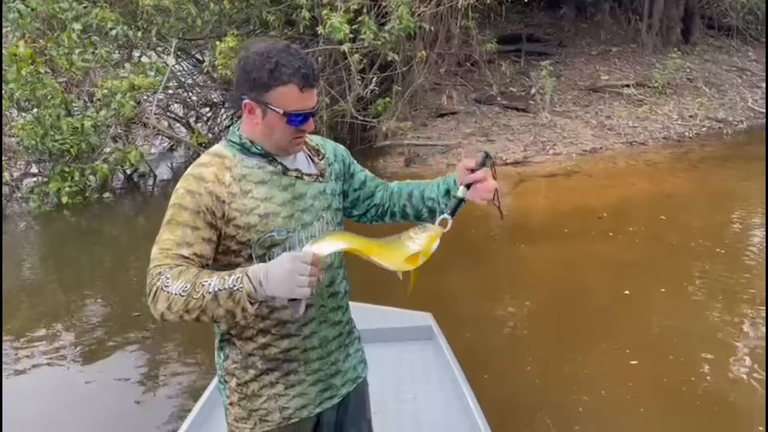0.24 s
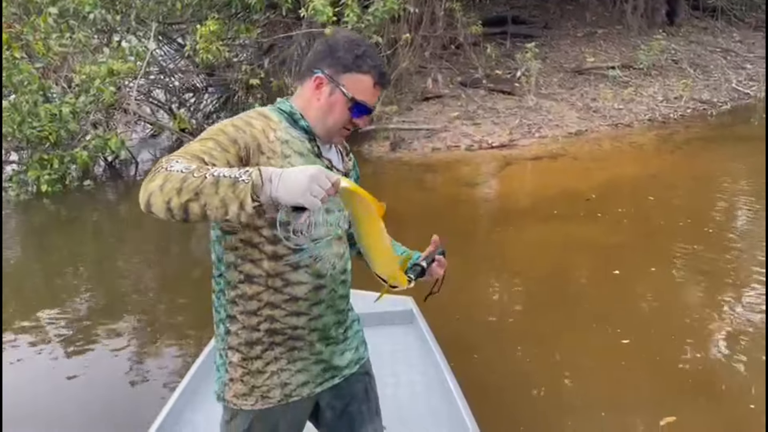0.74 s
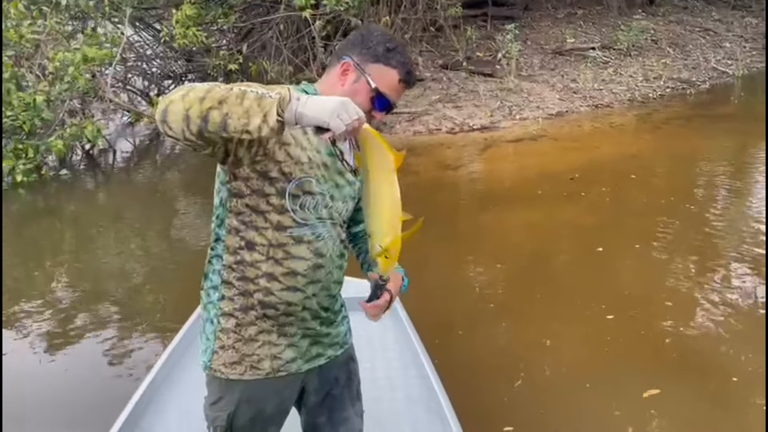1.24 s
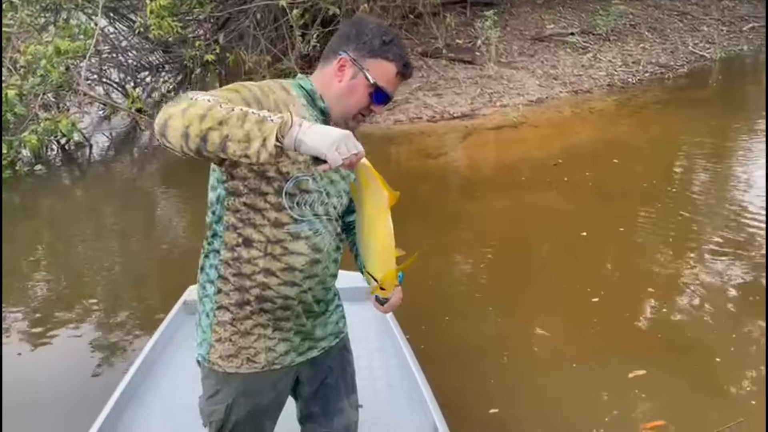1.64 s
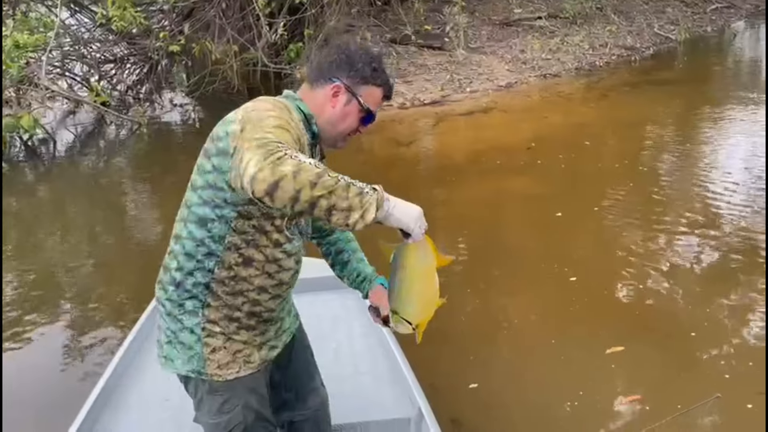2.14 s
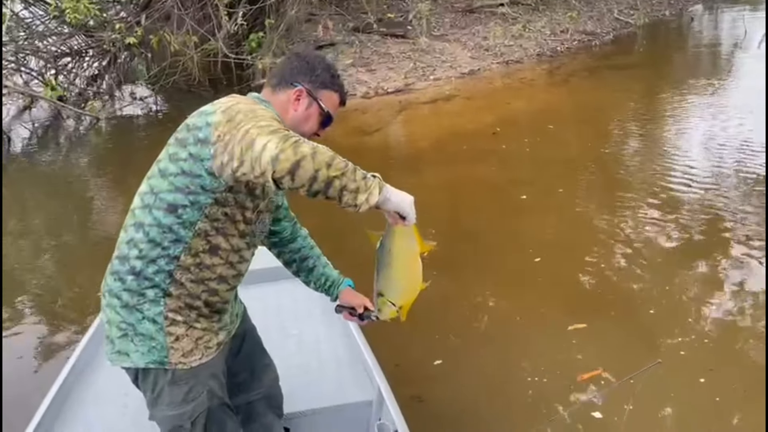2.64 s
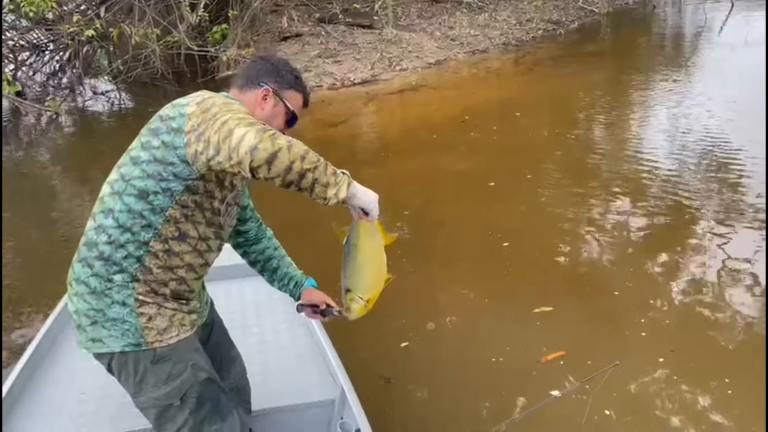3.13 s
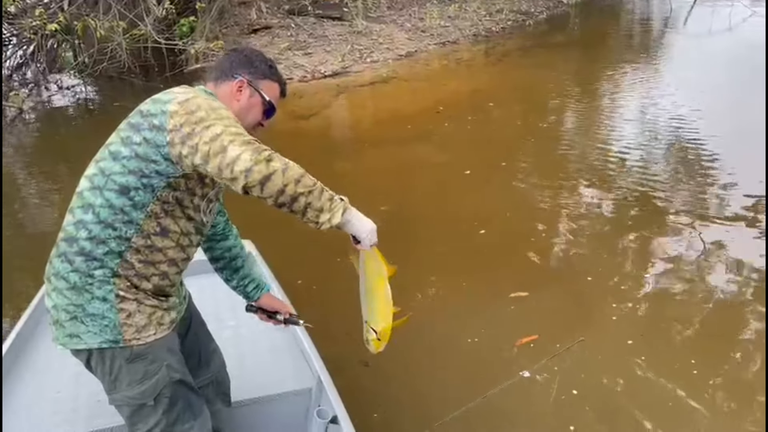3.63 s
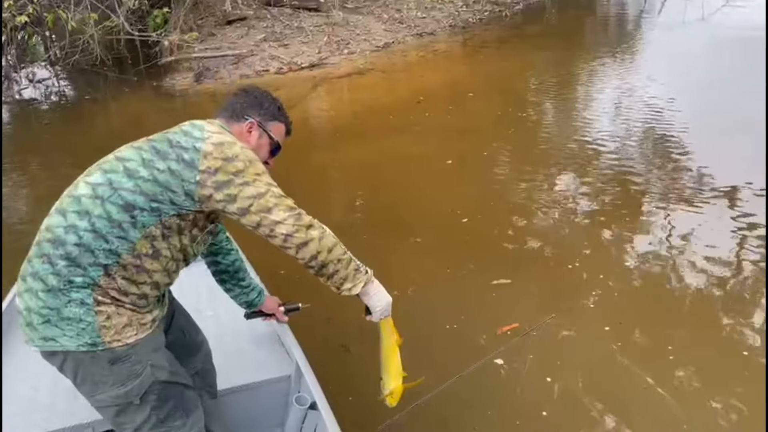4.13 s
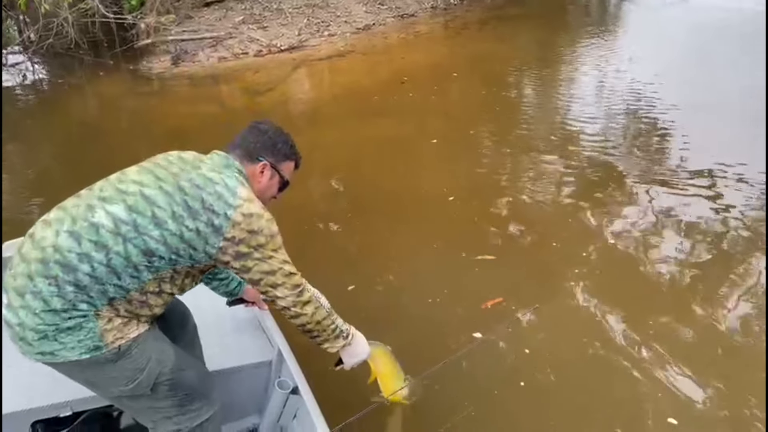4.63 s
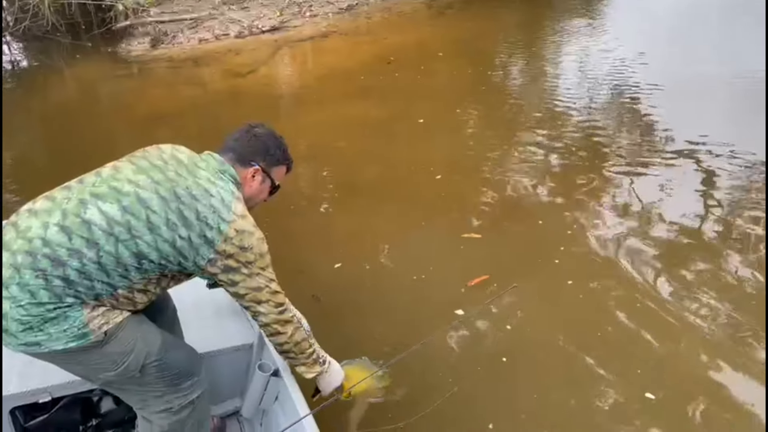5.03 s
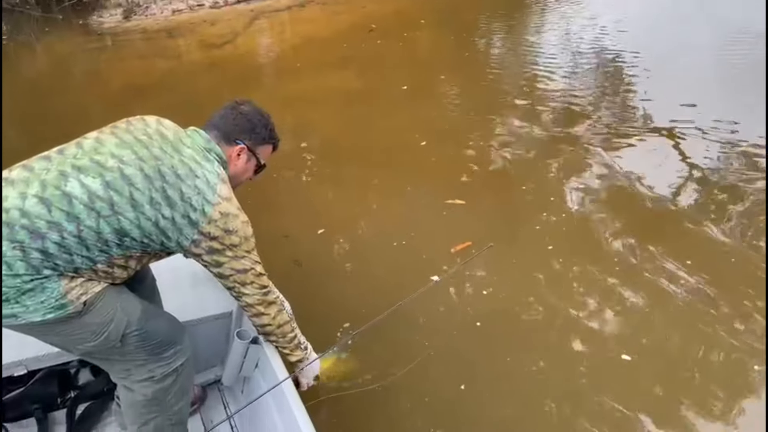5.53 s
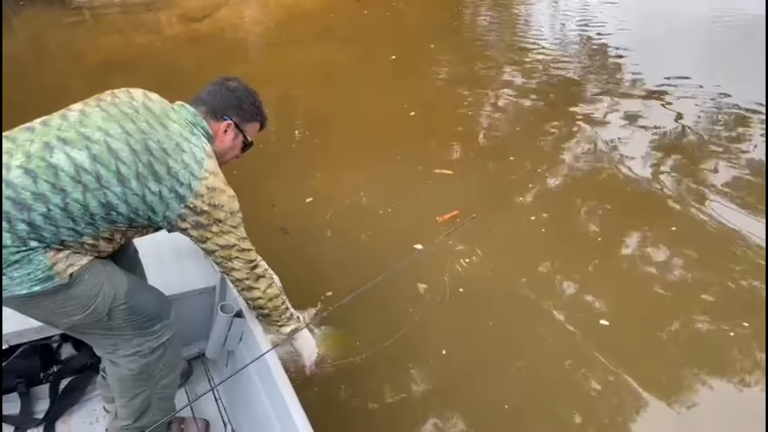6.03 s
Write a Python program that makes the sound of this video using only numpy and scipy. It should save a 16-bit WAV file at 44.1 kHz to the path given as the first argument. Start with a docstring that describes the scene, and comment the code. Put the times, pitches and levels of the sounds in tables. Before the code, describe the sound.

Close to a phone microphone, feet and tackle knock, scuff and click on a small aluminium boat. Hollow blows cluster in the first second, again just after two seconds, then thin out to scattered ticks and rubs. A bright snap comes near the end, then a quiet gap, and a hand and fish in still river water stir up a brief flurry of bubbles. Very faint forest hiss lies behind.

```python
"""Feet and tackle knock on a small aluminium boat, close to the microphone: each blow rings decaying panel modes.
Soles and gear thud, rub, scrape and snap on the hull (noise slips, jolted sines); grit ticks as noise cracks.
At the end an angler lowers a fish into the still river, and bubbles ring as gliding sines.
Behind the boat lies a far, faint forest hiss of shaped noise, wider than the boat.
The microphone is a phone with two close ports, its deepest bass and highest treble cut."""
import sys
import numpy as np
from scipy import signal
from scipy.fft import rfft, irfft
from scipy.io import wavfile
from scipy.ndimage import uniform_filter1d

SR = 44100
rng = np.random.default_rng(int(sys.argv[2]) if len(sys.argv) > 2 else 0)


def int16_out(signal):
    """Quantize to a 16-bit WAV file."""
    q = np.round(np.clip(np.atleast_2d(signal).T, -1, 1) * 32767)
    wavfile.write(sys.argv[1], SR, q.astype(np.int16))


N = 276507

# far forest hiss, spectrum shape: f/Hz, level/dB
FOREST_SPECTRUM = [(18, 4), (30, 15.5), (163, -8), (384, -11), (1290, -16.5), (2680, -42), (4550, -59),
                   (5040, -19), (5860, -13), (6490, -4.5), (7940, -39), (10200, -38), (12500, -30),
                   (16200, -71), (22000, -120)]
FOREST_MID_DB = -73.5  # RMS of the part common to both channels

# single bubbles: t/s, peak level/dB, start pitch f/Hz, T60/ms,
# glide/1 (half the pitch change over one T60, as a share of the start pitch)
BUBBLES = [(1.663, -56.5, 887, 48, 0.1), (4.761, -48, 1090, 38, 0.02), (4.792, -41.5, 1280, 25, -0.019),
           (5.009, -61.5, 1016, 78, -0.0047), (5.877, -41, 942, 43, 0.17), (5.898, -37, 730, 24, -0.11),
           (5.918, -46.5, 2010, 40, 0.003), (5.925, -50, 1040, 41, 0.045), (5.937, -47, 528, 70, -0.042),
           (5.956, -42, 870, 23, 0.4), (5.957, -35, 1300, 23, 0.78), (5.957, -49, 2620, 30, 0.2),
           (5.998, -32, 974, 17, 0.3), (6.015, -31, 966, 38, 0.1), (6.036, -32, 902, 38, 0.014),
           (6.066, -34, 1540, 18, 0.053), (6.076, -39.5, 695, 53, 0.11), (6.078, -38.5, 280, 35, -0.27),
           (6.108, -51, 478, 60, 0.15), (6.158, -37.5, 1990, 28, -0.0085), (6.163, -45, 706, 41, -0.11),
           (6.18, -40.5, 2030, 27, -0.24), (6.211, -38.5, 503, 56, -0.035), (6.044, -38, 810, 25, -0.024),
           (6.197, -42, 700, 34, 0.05)]
# churn of small bubbles around the hand: start t/s, end t/s, middle peak level/dB
CHURN = (5.99, 6.27, -52.5)

# hull panel modes: f/Hz, relative level/dB, T60/s (knocks scale this)
HULL_MODES = [(55, -28.5, 0.21), (83.5, 2.5, 0.2), (103.7, -8.5, 0.6), (126.5, 5.5, 0.13),
              (154.4, 1.5, 0.19), (217, -2.5, 0.11), (249.6, 6, 0.1), (280.5, 0.5, 0.14), (312.8, 4, 0.081),
              (358.3, 3, 0.12), (418, -3.5, 0.064), (501, -9.5, 0.2), (563.5, -1.5, 0.088),
              (727.7, -5, 0.11), (811, -10, 0.14), (894, -6.5, 0.088), (1005, -7, 0.098),
              (656.4, -6, 0.098)]
# rubbing soles and cloth, spectrum shape: f/Hz, level/dB
SCUFF_SPECTRUM = [(240, -4.5), (400, 7), (543, -6.5), (795, -2), (1050, -9), (1850, -3.5), (2060, -4),
                  (5000, -12), (6500, -10), (11000, -120)]
# fine grit, spectrum shape: f/Hz, level/dB
GRIT_SPECTRUM = [(1470, -101.5), (2500, 1), (4200, 3.5), (5100, -40.5), (6330, 5), (8570, 7.5),
                 (10400, -1.5), (11800, -6), (12500, -61), (16200, -72), (22000, -120)]
# soles, cloth and water dragged along the hull: start t/s, length/s, scuff level/dB, swell/(dB/s),
# grit over scuff level/dB, hull boom level/dB, deck panel level/dB
DRAGS = [(0.188, 0.042, -100, -4, -18, -79, -61.5), (0.295, .075, -73, 90, -7, -81, -81),
         (0.384, 0.1, -56, -11, -5, -51.5, -53.5), (0.51, 0.055, -80, -8, 7, -54, -57),
         (0.583, 0.098, -51.5, 28, -9.5, -41, -49.5), (0.734, 0.016, -57.5, -91, -11, -31, -44),
         (0.781, 0.11, -64, -22, -4, -54, -65), (1, 0.1, -62, -27, -8.5, -73, -61),
         (1.107, 0.058, -59.5, 83, -4, -79, -74), (1.185, 0.067, -49.5, -22, -14.5, -59, -44.5),
         (1.569, 0.023, -58, 10, -9.5, -51, -58.5), (1.664, 0.031, -69, -7, -18, -51.5, -57),
         (1.818, 0.026, -67, -3, -15, -55.5, -58), (1.739, 0.048, -60.5, 83, -4.5, -63, -60.5),
         (1.915, 0.056, -77.5, -16, 14, -55, -66), (2.059, 0.068, -47.5, -23, -6.5, -55, -47.5),
         (2.176, 0.083, -51, 38, -6.5, -48, -48), (2.271, 0.12, -42.5, -8, -8.5, -68, -50),
         (2.469, 0.027, -54, 10, -13, -58, -73), (2.57, 0.17, -56.5, -52, -2.5, -74, -59),
         (2.747, 0.011, -80, 2, -5, -55, -78), (2.872, 0.087, -58, -12, -5, -80, -59),
         (3.019, 0.012, -55.5, -5, -10, -58, -61), (3.099, 0.044, -63, 5, 2, -73, -57.5),
         (3.402, 0.0045, -48.5, -40, -6.5, -64, -49), (3.528, 0.019, -56.5, 30, 9.5, -78, -68),
         (3.64, 0.14, -62.5, -14, -6.5, -79, -63.5), (4.079, 0.22, -57, 13, -4, -87, -57.5),
         (4.355, 0.015, -80, -5, -20, -51.5, -77), (4.436, 0.0036, -54.5, -1, -25, -54.5, -76),
         (4.57, 0.078, -47.5, 1, 0, -65, -53), (4.8, 0.11, -68, -120, -19, -72, -47),
         (5.712, 0.016, -87, -30, -16, -70, -65), (5.892, 0.069, -57.5, -32, -15, -50, -69),
         (6.032, 0.076, -49, 15, 0.5, -52.5, -58), (6.105, 0.13, -50.5, 23, -10, -71, -71)]
DRAG_ATTACK_DB_S = 914
SCUFF_FADE_DB_S, BOOM_FADE_DB_S, DECK_FADE_DB_S = 409.5, 156.5, 274
# restless small movements between the drags: t/s, scuff level/dB, hull boom level/dB, deck panel level/dB
STIR = [(0.0, -80.5, -70.5, -79.5), (0.38, -86, -75, -83), (0.59, -66, -57, -62), (0.77, -76.5, -58, -65.5),
        (1.46, -69.5, -64.5, -66), (2.11, -67.5, -58, -75), (2.23, -67, -50, -46.5),
        (2.71, -63.5, -65.5, -68.5), (3.32, -68, -68, -68), (3.58, -60.5, -67, -72), (3.95, -76, -76, -71),
        (4.36, -68.5, -69, -66), (4.7, -54, -77, -51), (4.98, -73, -71.5, -73.5),
        (5.46, -81.5, -79.5, -81.5), (5.76, -70.5, -80, -71.5), (6.09, -54.5, -75, -57),
        (6.27, -55, -50, -45)]
STIR_GRIT_DB = -4  # fine grit over scuffing
STIR_WAVER_DB, STIR_WAVER_S = 1, 0.03  # RMS waver of scuff and grit, and its smoothing time

# short pitched scrapes and snaps of the hull: t/s, steady length/s, pitch f/Hz, width f/Hz, RMS level/dB
SCRAPES = [(0.34, .02, 2200, 250, -68), (0.387, .006, 1885, 250, -55), (0.448, 0.0055, 1640, 254, -53.5),
           (0.454, 0.055, 286, 39.8, -51.5), (0.482, 0.02, 537, 49.4, -50.5),
           (0.575, 0.032, 827, 61.4, -55.5), (0.901, 0.012, 2390, 240, -69),
           (1.107, 0.014, 1560, 201, -54.5), (2.11, 0.0064, 1906, 202, -47.5),
           (2.235, 0.003, 2280, 250, -43.5), (2.272, 0.032, 802, 85.4, -46), (2.329, 0.028, 2150, 121, -65),
           (2.344, 0.058, 927, 222, -46.5), (3.385, 0.039, 1050, 67, -60), (3.766, 0.0074, 1053, 158, -51),
           (3.768, 0.0038, 1950, 189, -49.5), (1.566, 0.014, 460, 51, -51),
           (1.574, 0.028, 366, 48.7, -54.5), (1.793, 0.088, 276.7, 50, -59.5),
           (3.449, 0.15, 1050, 110, -68.5), (3.633, 0.08, 990, 90, -68.5), (3.719, 0.11, 139, 50.5, -56.5),
           (3.387, 0.059, 370, 66.3, -53.5), (3.532, 0.054, 330, 51, -58), (3.629, 0.091, 360.5, 80, -63),
           (2.255, 0.18, 369.5, 131.4, -49), (4.566, 0.025, 819, 40.2, -47.5),
           (4.575, 0.05, 572, 49.4, -54), (4.62, 0.017, 790, 60, -51), (4.653, 0.048, 825, 40, -50),
           (4.617, 0.057, 244, 39.2, -47), (4.638, 0.028, 3300, 890, -49.5)]
SCRAPE_WOBBLE_DB, SCRAPE_SLIP_RAD = 3.5, 1.1  # RMS jolts of level and phase
SCRAPE_RISE_S, SCRAPE_FALL_S = 0.002, 0.012  # the fall is never longer than the scrape

# short low thuds and knocks on the hull: t/s, length/s, pitch f/Hz, peak level/dB
THUDS = [(1.559, 0.018, 131, -35.5), (1.581, 0.026, 129, -37.5), (1.613, 0.015, 150, -50),
         (1.635, 0.026, 135, -47.5), (1.683, 0.021, 111, -39.5), (1.724, .045, 105, -50),
         (1.92, 0.03, 120, -49.5), (1.954, 0.042, 129, -44.5), (2.178, 0.021, 128, -30),
         (2.197, 0.025, 151, -29.5), (2.232, .028, 109, -38), (2.286, .012, 330, -37),
         (2.3, .013, 320, -33)]

# ticks and snaps of tackle and grit: t/s, peak level/dB before the treble trim, brightest f/Hz,
# chance left-right balance/dB
TICKS = [(0.295, -62, 2470, 14), (0.377, -38.5, 1960, -2.5), (0.418, -41, 1480, -2),
         (0.5743, -38.5, 1760, -2), (0.648, -33, 1660, -2.5), (0.676, -36, 5560, 7), (0.711, -46, 3500, 1),
         (1.035, -55, 3200, 0), (1.108, -48, 1570, -20), (1.2152, -36.5, 1860, -9), (1.5266, -53, 2300, -3),
         (1.903, -45, 2410, -1.5), (1.952, -42.5, 6000, 10), (2.031, -44, 5000, -3),
         (2.052, -33.5, 2240, -6), (2.109, -37, 1900, -6), (2.199, -34, 3330, 0), (2.2345, -36, 2260, -2),
         (2.2876, -22, 2400, -6), (2.316, -35, 2200, -8), (2.397, -31, 2400, -0.5), (2.497, -48, 1710, -1),
         (2.5723, -24, 2200, 6), (2.6262, -34, 1490, 3.5), (2.6517, -34.5, 4930, 25),
         (2.678, -37.5, 2930, 16), (2.793, -42, 1940, 14), (2.851, -43, 2300, 3), (2.873, -39.5, 1900, 3),
         (3.004, -42, 2520, 7), (3.2936, -44, 2270, 6), (3.32, -40, 3340, 22), (3.362, -46, 3300, 3),
         (3.3838, -34.5, 2100, 13), (3.493, -44, 3950, 5), (3.519, -33.5, 2960, 4),
         (3.538, -26.5, 3220, 21), (3.6125, -40, 2500, 2), (3.7476, -44, 2760, 20),
         (3.7669, -37.5, 1930, 0.5), (4.0803, -33.5, 2480, 5), (4.218, -38, 2860, 8), (4.349, -35, 2560, 2),
         (4.4325, -42, 2700, 13), (4.5006, -48, 2330, 3), (4.5207, -42.5, 2940, 3), (4.5655, -34, 1290, 8),
         (4.778, -20, 3340, 9), (5.5412, -52, 2240, 2.5), (5.616, -58, 1950, 1), (5.683, -36.5, 2570, 23),
         (5.809, -42.5, 2700, 8), (5.865, -39.5, 3600, 12), (5.899, -34.5, 1500, 10), (5.959, -41, 1560, 1),
         (5.997, -32.5, 1100, 1), (6.0358, -32.5, 2700, 5), (6.07, -27, 1540, 6), (6.16, -36, 1940, 1)]
SNAP_T60_S, RATTLE_T60_S, RATTLE_DB = 0.028, 0.042, -2.5  # a short snap over a longer rattle

# blows on the hull: t/s, peak level/dB, centre of the woken modes f/Hz, ring scale (200 = the modes' own T60),
# treble slope/(dB/octave), lift of the struck panel/dB
KNOCKS = [(0.184, -48.5, 242, 210, -4.5, 2), (0.348, -49, 294, 140, -4, 16), (0.397, -40, 271, 270, -4, 13),
          (0.488, -31.5, 127.5, 270, -0.5, 18), (0.588, -29.5, 140, 140, -8, -22),
          (0.652, -33, 246, 220, -0.5, 6), (0.736, -22, 375, 145, 0.5, -4), (0.7455, -27, 690, 130, -7, 1),
          (0.758, -29.5, 78.1, 430, -4, 1), (1.185, -19.5, 281.7, 125, 0, 13.5),
          (1.206, -32, 257, 240, -15, 26), (2.049, -31, 334, 510, -0.5, 15),
          (2.101, -34.5, 240, 110, -40, -28), (2.178, -34, 200, 87, -7, 5), (2.5, -41.5, 273, 170, -9, -4),
          (2.574, -34, 266, 140, 1.5, 5.5), (2.63, -43.5, 268, 510, -2.5, -1), (2.876, -46, 276, 250, 2, 0),
          (3.409, -41.5, 262, 400, -7, 0), (3.767, -43.5, 280, 150, -8, -11),
          (4.175, -37, 279, 180, 0, 2.5), (4.201, -40.5, 262, 150, -5, -12),
          (4.344, -43.5, 142, 140, 1, 16), (4.564, -30.5, 257, 260, 1, 6.5),
          (4.594, -37.5, 282, 110, -7, 20), (4.777, -32.5, 557, 170, 3, 5.5),
          (5.687, -47, 388, 200, 1.5, 13), (5.901, -36, 213, 60, -7, 21), (5.909, -41, 123, 85, 5, 13),
          (5.999, -39.5, 210, 130, -8, 13), (6.203, -40, 250, 130, -1, 3)]
# dense modes above the panels: lowest f/Hz, span/octaves, level/dB and T60/s at the lowest (knocks scale T60)
SHEET = (1100, 2.0, -11, .1)

# phase between left and right channels: f/Hz, phase/rad
CHANNEL_PHASE = [(0, 0), (1380, 0.4), (1640, 0.4), (2930, 1.0), (4050, 0.0), (4910, 0.4), (6370, -0.3),
                 (6800, -0.8), (7670, -3.1), (9560, -3.4), (9820, -5.2), (10200, -6.0), (10800, -6.3),
                 (12200, -6.3)]
# level difference between left and right channels: f/Hz, level/dB
CHANNEL_TILT = [(60, -0.5), (110, 0.5), (190, 1), (350, 1.5), (630, 3), (1140, 2.5), (2060, 0.5), (3710, 2),
                (6690, 1), (12000, -1)]
# scatter of opposite sign in the two channels: f/Hz, level/dB
SCATTER = [(60, -20), (300, -22), (1000, -11), (2500, -5), (5000, -7), (8000, -11), (12000, -11)]
BOTTOM_HZ, TOP_HZ = 57, 12000


def undb(db):
    """Turn decibels into an amplitude ratio."""
    return 10 ** (np.asarray(db) / 20)


def unit(x):
    """Scale a signal to an RMS of one."""
    return x / np.sqrt(np.mean(x ** 2))


def smooth_noise(shape, size):
    """Slow random drift: white noise averaged over a window of this many samples."""
    return uniform_filter1d(rng.standard_normal(shape), size=size)


def read(table, size):
    """Read a (f/Hz, value) table at every frequency bin, interpolating over log frequency."""
    hz, value = np.transpose(table)
    bins_hz = np.fft.rfftfreq(size, 1 / SR)
    return np.interp(np.log(bins_hz + 1), np.log(hz + 1), value)


def colour(x, table):
    """Shape a signal by a spectrum in dB."""
    size = x.shape[-1]
    return irfft(rfft(x) * undb(read(table, size)), size)


def curves(table):
    """Interpolate the columns of a table over time, at every sample."""
    s, *columns = np.transpose(table)
    return [np.interp(np.arange(N) / SR, s, column) for column in columns]


def add(out, s, sound, db):
    """Mix a short sound in at s seconds, scaled to this peak level."""
    i = int(s * SR)
    n = min(sound.shape[-1], N - i)
    out[..., i:i + n] += sound[..., :n] * undb(db) / np.abs(sound).max()


def forest():
    """Far insects, leaves and water: a smooth hiss whose side part makes it wider than the boat."""
    mid = unit(colour(rng.standard_normal(N), FOREST_SPECTRUM))
    side = unit(colour(rng.standard_normal(N), FOREST_SPECTRUM))
    wide = colour(side, [(60, -4.5), (350, 3.0), (1000, 3.5), (4000, 5.0), (12000, -24.0)])
    return undb(FOREST_MID_DB) * (mid + wide * np.array([[1], [-1]]))


def churn():
    """Many small bubbles at random moments; the lower the pitch, the longer the ring."""
    start, end, middle_db = CHURN
    when, size, pitch = rng.random((240, 3)).T
    hz = 260 * 2 ** (3.4 * pitch)
    peak_db = middle_db + 14 * (size - 0.5)
    t60_ms = 6 + 7000 / hz
    glide = np.full(len(hz), 0.22)
    return np.transpose([start + when * (end - start), peak_db, hz, t60_ms, glide])


def bubbles():
    """Trapped air rings as a decaying sine whose pitch glides, mostly upward."""
    out, t = np.zeros(N), np.arange(SR // 5) / SR
    every = [*BUBBLES, *churn()]
    # moving water shakes each bubble's phase a little, in turns
    shake = 0.8 * smooth_noise((len(every), len(t)), SR // 250)
    for (s, peak_db, hz, t60_ms, glide), jolt in zip(every, shake):
        age = 1000 * t / t60_ms
        turns = hz * t * (1 + glide * age) + jolt
        # it holds a moment, then dies quickly
        fade = undb(-60 * age ** 1.38) * np.minimum(age / 0.045, 1)
        add(out, s, np.sin(2 * np.pi * turns) * fade, peak_db)
    return out


def grains(rate, spread_db, smear_s):
    """Noise broken into slips of uneven but bounded size, each with a sharp start and a short tail."""
    starts = rng.random(N) < rate / SR  # rate is in slips per second
    size = starts * undb(spread_db * np.minimum(rng.exponential(size=N), 3.5))
    tail = signal.lfilter([1], [1, -np.exp(-1 / (smear_s * SR))], size)
    return unit(tail * rng.standard_normal(N))


def ring(push, lo_hz, hi_hz):
    """Hull modes between two frequencies, driven by a force as decaying resonators."""
    out = 0
    for hz, db, t60 in HULL_MODES:
        if lo_hz <= hz < hi_hz:
            pole = np.exp(2j * np.pi * hz / SR - np.log(1000) / (t60 * SR))
            out = out + undb(db) * signal.lfilter([1], [1, -pole], push).imag
    return unit(out)


def patchy(table, edges_hz, rate, spread_db, smear_s):
    """Rubbing touches many spots at once: each octave or so of the spectrum slips in its own time."""
    out = 0
    for hz in edges_hz:
        window = [(hz / 4, -40), (hz / 2, -12), (hz, 0), (hz * 2, -12), (hz * 4, -40)]
        out = out + colour(grains(rate, spread_db, smear_s), window)
    return unit(colour(out, table))


def drags(fade_db_s, level_db, swell_db_s):
    """Power of the drags: each sets in quickly, holds, swells or sinks for its length, then fades."""
    t = np.arange(N) / SR
    power = np.zeros(N)
    for (s, length, *_), db, swell in zip(DRAGS, level_db, swell_db_s):
        held = np.clip(t - s, 0, length)
        attack_db = -DRAG_ATTACK_DB_S * np.maximum(s - t, 0)
        fade_db = -fade_db_s * np.maximum(t - s - length, 0)
        power += undb(2 * (db + swell * held + attack_db + fade_db))
    return power


def shuffle():
    """Soles slip on the floor: slow slips boom, quicker ones rattle the panels, rubbing scuffs and crackles."""
    _, _, scuff_db, swell, grit_db, boom_db, deck_db = np.transpose(DRAGS)
    stir, stir_boom, stir_deck = (undb(2 * level_db) for level_db in curves(STIR))
    # the small scuffs come and go
    waver = unit(smooth_noise(N, int(STIR_WAVER_S * SR)))
    stir = stir * undb(2 * STIR_WAVER_DB * waver)
    stir_grit = stir * undb(2 * STIR_GRIT_DB)

    boom = ring(grains(90, 2.2, 0.008), lo_hz=0, hi_hz=180)
    deck = ring(grains(150, 2.5, 0.005), lo_hz=180, hi_hz=1100)
    scuff = patchy(SCUFF_SPECTRUM, (600, 1200, 2400, 4800), 450, 2.4, 0.005)
    grit = patchy(GRIT_SPECTRUM, (2800, 5600, 11200), 500, 0.83, 0.006)

    # small movements and drags add as powers; the boom does not swell
    boom_power = stir_boom + drags(BOOM_FADE_DB_S, boom_db, 0 * swell)
    deck_power = stir_deck + drags(DECK_FADE_DB_S, deck_db, swell)
    scuff_power = stir + drags(SCUFF_FADE_DB_S, scuff_db, swell)
    grit_power = stir_grit + drags(SCUFF_FADE_DB_S, scuff_db + grit_db, swell)
    return (boom * np.sqrt(boom_power) + deck * np.sqrt(deck_power)
            + scuff * np.sqrt(scuff_power) + grit * np.sqrt(grit_power))


def scrapes():
    """Short pitched scrapes and snaps of the hull: a sine whose size and phase are jolted unevenly."""
    out, t = np.zeros(N), np.arange(SR // 3) / SR
    for s, length, hz, width_hz, db in SCRAPES:
        # a wider pitch means faster jolts
        drift, wobble = (unit(smooth_noise(len(t), int(SR / width_hz))) for _ in range(2))
        tone = np.sin(2 * np.pi * hz * t + SCRAPE_SLIP_RAD * drift) * undb(SCRAPE_WOBBLE_DB * wobble)
        edges = np.cumsum([0, SCRAPE_RISE_S, length, min(SCRAPE_FALL_S, length)])
        level = np.std(tone[:int(edges[-1] * SR)])
        tone = tone / level * np.interp(t, edges, [0, 1, 1, 0])
        i = int((s - SCRAPE_RISE_S) * SR)
        out[i:i + len(t)] += undb(db) * tone
    return out


def thuds():
    """Short low thuds and knocks on the hull: a few swings of a sine that swell and are stopped."""
    out = np.zeros(N)
    for s, length, hz, peak_db in THUDS:
        t = np.arange(int(length * SR)) / SR
        swell = np.sin(np.pi * t / length) ** 0.55
        add(out, s, swell * np.sin(2 * np.pi * hz * t), peak_db)
    return out


def ticks():
    """Tackle and grit crack as noise around a pitch, sharp at the start, with a chance balance between the ports."""
    out, t = np.zeros((2, N)), np.arange(4096) / SR
    snap = undb(-60 * t / SNAP_T60_S)
    rattle = undb(RATTLE_DB - 60 * t / RATTLE_T60_S)
    fade = np.minimum(t / 0.00032, 1) * (snap + rattle)
    for s, peak_db, hz, balance_db in TICKS:
        shape = [(hz / 8, -22), (hz / 2, -9), (hz / 1.17, -5), (hz, 0),
                 (hz * 1.33, -5), (hz * 4, -13), (30000, -20)]
        crack = colour(rng.standard_normal(len(t)), shape) * fade
        add(out, s, crack * undb([[balance_db / 2], [-balance_db / 2]]), peak_db)
    return colour(out, [(10500, 0.5), (12300, -11)])  # treble trim


def knocks():
    """A blow rings the modes near it: panels start nearly in step, the dense sheet modes loosely."""
    out, t = np.zeros(N), np.arange(SR // 2) / SR
    low_hz, span, sheet_db, sheet_t60 = SHEET
    step = 2 ** np.linspace(0, span, num=40)
    sheet = np.transpose([low_hz * step, sheet_db - 6 * np.log2(step), sheet_t60 / step ** 0.7])
    hz, db, t60 = (column[:, None] for column in np.transpose([*HULL_MODES, *sheet]))
    start_spread_turns = np.where(hz < low_hz, 0.2, 1)
    chance = rng.standard_normal((len(KNOCKS), 3, len(hz), 1))
    for knock, (spread, start, detune) in zip(KNOCKS, chance):
        s, peak_db, centre_hz, ring_scale, slope_db, lift_db = knock
        octaves = np.log2(hz / centre_hz)
        # the slope above the centre sets how much treble the contact wakes
        near_db = np.where(octaves > 0, slope_db, 10.5) * octaves
        # the panel under the blow stands out or holds back
        near_db = near_db + lift_db * np.exp(-(octaves / 0.11) ** 2) + 1.5 * spread
        decay = undb(-60 * t / (t60 * ring_scale / 200))
        onset = 1 - np.exp(-t * hz * 2.65)
        turns = hz * (1 + 0.025 * detune) * t + start_spread_turns * start
        modes = undb(db + near_db) * decay * onset * np.sin(2 * np.pi * turns)
        add(out, s, modes.sum(axis=0), peak_db)
    return out


def ports(near):
    """Two close ports: phase and level differences that change with pitch, and some scatter unlike at each."""
    half = np.array([[0.5], [-0.5]])
    phase = np.interp(np.fft.rfftfreq(N, 1 / SR), *np.transpose(CHANNEL_PHASE))
    tilt = undb(half * read(CHANNEL_TILT, N))
    direct = irfft(rfft(near) * tilt * np.exp(1j * half * phase), N)
    t = np.arange(2048) / SR
    echo = rng.standard_normal(2048) * undb(-60 * t / 0.05)
    echo = signal.fftconvolve(near[0], echo / np.linalg.norm(echo))[:N]
    # sounds come from ever-changing spots, so the scatter keeps changing sign and size
    wander = unit(smooth_noise(N, SR // 40))
    return direct + 2 * half * colour(echo * wander, SCATTER)


def scene():
    """The boat close to the two ports, over the far forest."""
    boat = bubbles() + shuffle() + scrapes() + thuds() + ticks() + knocks()
    return forest() + ports(boat)


def record(dry):
    """The phone rolls off the deepest bass and cuts the top."""
    bass_cut = signal.butter(3, BOTTOM_HZ, "highpass", fs=SR, output="sos")
    top_cut = signal.ellip(10, 0.2, 80, TOP_HZ, fs=SR, output="sos")
    return signal.sosfilt(top_cut, signal.sosfilt(bass_cut, dry))


dry = scene()
out = record(dry)
int16_out(out)
```